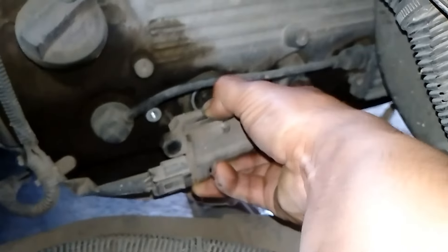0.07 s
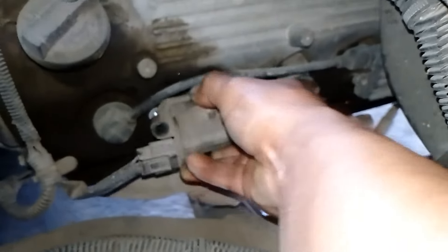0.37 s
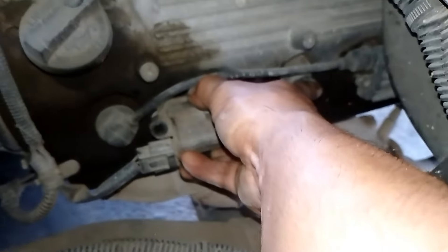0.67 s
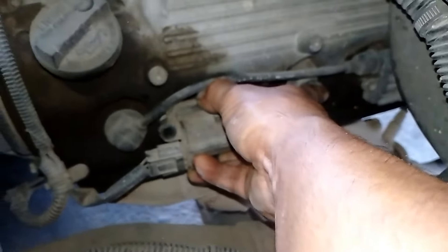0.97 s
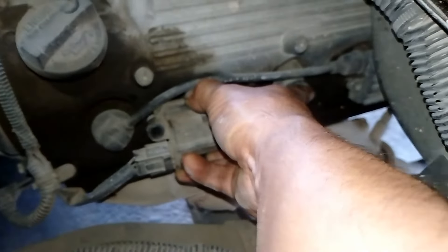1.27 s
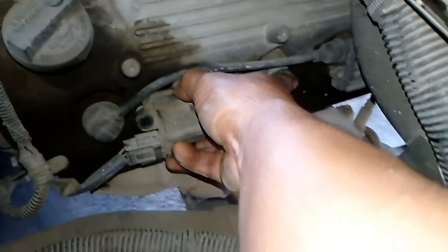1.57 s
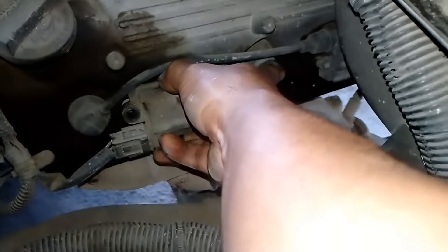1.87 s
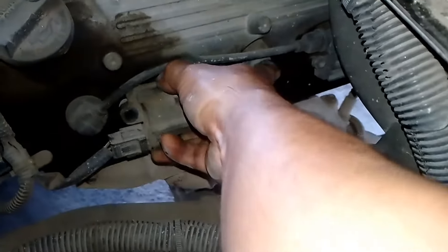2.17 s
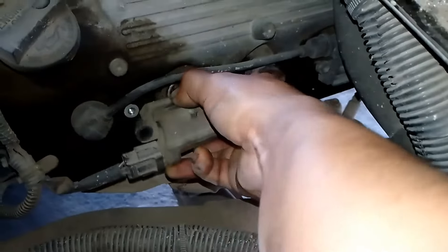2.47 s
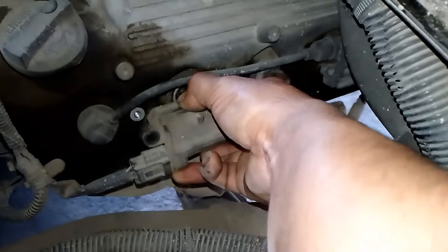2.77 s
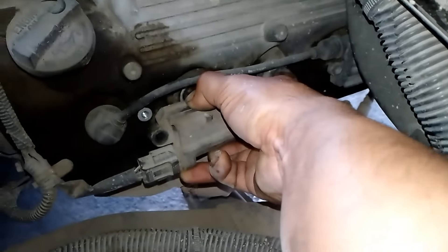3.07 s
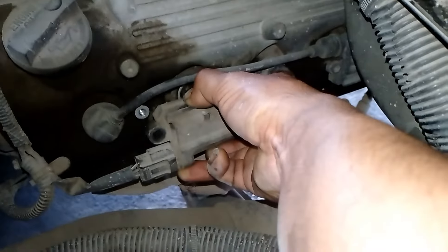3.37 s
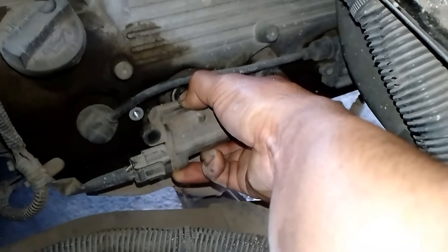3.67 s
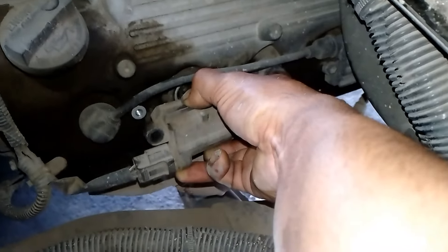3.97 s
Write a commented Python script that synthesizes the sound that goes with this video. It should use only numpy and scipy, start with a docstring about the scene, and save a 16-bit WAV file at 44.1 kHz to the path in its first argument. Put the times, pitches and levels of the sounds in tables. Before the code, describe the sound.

A car engine idles close by, with a low rumble, steady hum, airy wash and rapid ticking. At first it misfires, with sharp electric spark snaps and a faint hollow whoosh. At about 0.5 seconds the snapping stops and the idle rises and smooths. From about 2.4 seconds the fast, ringing snaps return, and the engine slows and shakes unevenly until the end at 4 seconds.

```python
"""A four-cylinder engine rumbles and shakes at a slow idle, heard from just above the valve cover.
With it come a steady hum (probably the idle air valve), a hollow whoosh, a wash of belts and air, and
ticking injectors and valves. An ignition coil is lifted, so its spark jumps outside once per crank turn
and sets the plug well ringing. The coil is reseated and the idle rises and smooths; when it is lifted
again, the snapping and the misfire return."""
import sys
import numpy as np
from scipy import signal
from scipy.fft import rfft, irfft
from scipy.io import wavfile
from scipy.ndimage import uniform_filter1d

SR = 44100
rng = np.random.default_rng(int(sys.argv[2]) if len(sys.argv) > 2 else 0)


def wrap_up_sound(samples):
    """Save the sound to the file named by the first command line argument, as 16-bit audio."""
    columns = np.atleast_2d(samples).T
    # keep every value between -1 and 1, then stretch to whole-number steps
    tamed = np.clip(columns, -1, 1)
    steps = np.round(tamed * 32767).astype(np.int16)
    wavfile.write(sys.argv[1], SR, steps)


N = 176400


def undb(db):
    """Decibels to amplitude ratio."""
    return 10 ** (np.asarray(db) / 20)


def unit(x):
    """Normalise to rms 1."""
    return x / np.sqrt(np.mean(x ** 2))


def curve(rows):
    """Linear interpolation of (seconds, value) rows."""
    return np.interp(np.arange(N) / SR, *np.array(rows).T)


def drift(rate_hz):
    """Smoothed random fluctuation of rms 1."""
    hold = int(SR / rate_hz)
    steps = np.repeat(rng.standard_normal(N // hold + 1), hold)
    return unit(uniform_filter1d(uniform_filter1d(steps, hold), hold)[:N])


def colour(x, spectrum, resonances=()):
    """Minimum-phase filter of unit power through (Hz, dB) points, with resonance peaks on top."""
    freq = np.maximum(np.arange(N // 2 + 1) * SR / N, 1)
    hz, db = np.array(spectrum).T
    peaks_db = sum(boost / (1 + (2 * (freq - centre) / width) ** 2)
                   for centre, width, boost in resonances)
    gain = unit(undb(np.interp(np.log(freq), np.log(hz), db) + peaks_db))
    cepstrum = irfft(np.log(gain))
    cepstrum[1:N // 2] *= 2
    cepstrum[N // 2 + 1:] = 0
    return irfft(rfft(x) * np.exp(rfft(cepstrum)))


def noise(spectrum, resonances=()):
    """Filtered white noise of rms near 1."""
    return colour(rng.standard_normal(N), spectrum, resonances)


def impacts(cycle, places, levels_db, rise_s, decay_s, scatter_db=0, repeat_s=0):
    """Noise bursts at set places in the engine cycle; being incoherent, they add in power."""
    t, power = np.arange(N // 40) / SR, np.zeros(N)
    envelope = (1 - np.exp(-t / rise_s)) * np.exp(-t / decay_s)
    for place, db in zip(places, levels_db):
        passes = np.arange(int(cycle[-1]) + 1) + place
        starts = np.interp(passes, cycle, np.arange(N) / SR, left=-1, right=-1)
        for start, chance in zip(starts, rng.standard_normal(len(starts))):
            for lag in {0, repeat_s}:
                add(power, start + lag, (envelope * undb(db + scatter_db * chance)) ** 2)
    return np.sqrt(power) * rng.standard_normal(N)


def add(out, start_s, x):
    """Superpose a short signal at a given time."""
    i = int(start_s * SR)
    if 0 <= i < N:
        out[i:i + len(x)] += x[:N - i]


# Firing harmonics. Each row: multiple of the cycle rate, relative dB firing evenly, and misfiring.
FIRING_ORDERS = [(2, -55, -55), (4, -48, -43), (6, -46, -64), (7, -57, -47), (8, -39, -39),
                 (10, -58, -38.5), (12, -52.5, -46), (16, -46, -49), (20, -38, -62), (22, -55, -40.5),
                 (24, -40.5, -61)]
# Blend from even firing to misfire. Each row: time in seconds, share from 0 to 1.
MISFIRE_SHARE = [(0, 1), (.36, 0.96), (.5, 0.05), (2.45, 0), (2.65, 0.84), (4, 0.85)]
# Swell of all the harmonics. Each row: time in seconds, gain in dB.
FIRING_GAIN = [(0, -8), (.28, -4), (.6, 4), (1, 2), (2.1, 0), (2.55, -3.5), (2.9, -2), (3.5, 1.5), (4, -8)]

def firing_rumble(cycle):
    """Periodic firing gives a harmonic series; a dead cylinder strengthens the in-between orders."""
    misfire = curve(MISFIRE_SHARE)
    harmonics = np.zeros(N)
    for order, even_db, rough_db in FIRING_ORDERS:
        level_db = even_db + (rough_db - even_db) * misfire + 1.7 * drift(rate_hz=5.3)
        harmonics += undb(level_db) * np.sin(2 * np.pi * (round(order) * cycle + rng.random()))
    return np.sqrt(2) * harmonics * undb(curve(FIRING_GAIN))


# Low noise band near 170 Hz. Each row: frequency in Hz, relative level in dB.
BOOM_SPECTRUM = [(90, -28.5), (125, -12.5), (150, 2.5), (185, 5), (215, -2), (280, -5.5), (340, -17.5),
                 (500, -44.5)]
# Swell of the boom. Each row: time in seconds, relative level in dB.
BOOM_LEVEL = [(0, -31.5), (.25, -30), (.38, -33.5), (.55, -29.5), (.8, -29), (1, -32.5), (2.4, -34),
              (2.85, -39.5), (3.08, -30.5), (3.28, -40), (3.45, -32), (3.8, -39.5), (3.92, -30.5)]

def boom(cycle):
    """Amplitude modulation: low noise throbs on each of the four strokes."""
    throb = 1 + 0.36 * np.cos(2 * np.pi * 4 * (cycle - 0.16))
    return noise(BOOM_SPECTRUM) * throb * undb(curve(BOOM_LEVEL) - 1)


def hum(pitch_hz=250.4, level_db=-29.5):
    """A pure tone, independent of engine speed, with slight frequency and amplitude modulation."""
    phase = 2 * np.pi * np.cumsum(pitch_hz + 0.42 * drift(rate_hz=6.48)) / SR
    return np.sqrt(2) * np.sin(phase) * undb(level_db + 0.7 * drift(rate_hz=7.04))


# Colour of the rushing air. Each row: frequency in Hz, relative level in dB.
WHOOSH_SPECTRUM = [(300, -50.5), (660, -10), (735, 7), (840, -18.5), (950, 0), (1100, 5), (1300, -11.5),
                   (2500, -70)]
# Its fade and return. Each row: time in seconds, level in dB.
WHOOSH_LEVEL = [(0, -38), (.45, -37.5), (.65, -43.5), (1.5, -51), (2.4, -61), (3, -49), (4, -42)]

def whoosh():
    """Two narrow spectral peaks make a rush of air sound hollow."""
    return undb(curve(WHOOSH_LEVEL)) * noise(WHOOSH_SPECTRUM)


# Noise of belts and air. Each row: frequency in Hz, relative level in dB.
WASH_SPECTRUM = [(12, 0.5), (30, -2.5), (55, 2), (80, 3.5), (120, -0.5), (270, 1.5), (340, -5.5),
                 (450, -6.5), (560, -11), (900, -14.5), (1300, -8.5), (2000, -4.5), (3400, -18),
                 (4400, -17.5), (5700, -28), (7800, -25.5), (9500, -33.5), (12500, -55), (15500, -36)]
# Modes of the valve cover. Each row: centre in Hz, width in Hz, boost in dB.
COVER_MODES = [(737, 37, 8), (1109, 52, 8), (1580, 30, 5), (2190, 12, 6.5), (2462, 47, 8.5), (2596, 31, 5),
               (2738, 37, 7.5), (3060, 42, 4)]

def belt_and_air_wash(level_db=-30.5):
    """Broadband noise of belts and air excites the resonances of the cover."""
    return undb(level_db + 0.43 * drift(rate_hz=25.2)) * noise(WASH_SPECTRUM, COVER_MODES)


# Injector timing. Each row: place in the cycle from 0 to 1, relative level in dB.
INJECTOR_CLICKS = [(0.119, 1.5), (.378, -1), (.63, -22), (0.886, -5.5)]
# Colour of a click. Each row: frequency in Hz, relative level in dB.
INJECTOR_SPECTRUM = [(3000, -36), (6000, -11), (7200, -9.5), (8100, 2), (9000, -19), (12500, -27),
                     (15500, -15)]

def injectors(cycle, open_s=0.0045):
    """Paired impacts: each injector clicks as it opens and again as it shuts."""
    places, levels_db = np.array(INJECTOR_CLICKS).T
    clicks = impacts(cycle, places, levels_db, rise_s=0.00073, decay_s=0.0035, repeat_s=open_s)
    return undb(-36.5) * colour(clicks, INJECTOR_SPECTRUM)


# Valve seatings. Each row: place in the cycle from 0 to 1, relative tick and clatter levels in dB.
VALVE_SEATINGS = [(0.001, 2, -1), (0.062, -5.5, -4.5), (0.25, -1.5, 2.5), (.312, -15, -1.5),
                  (0.497, -0.5, -0.5), (.55, -12.5, -12), (0.667, -13, -3), (0.753, -57, 1),
                  (0.948, -10, -3.5)]
# Colours of the tick and the clatter. Each row: frequency in Hz, relative level in dB.
TICK_SPECTRUM = [(900, -40.5), (2000, -1), (3100, -1), (4400, -6), (5500, -20), (7500, -20), (12000, -47.5),
                 (15500, -47)]
CLATTER_SPECTRUM = [(600, -18), (1400, -9), (2000, 1), (2700, -6.5), (3500, -2.5), (4400, -25.5),
                    (7000, -23.5), (15000, -53)]

def valves(cycle, rpm, db_per_rpm=0.0179):
    """Impact excitation: seating valves tick and clatter in the cover, harder at higher speed."""
    places, tick_db, clatter_db = np.array(VALVE_SEATINGS).T
    tick = impacts(cycle, places, tick_db, rise_s=0.00026, decay_s=0.0047)
    clatter = impacts(cycle, places, clatter_db, rise_s=0.0037, decay_s=0.014, scatter_db=1)
    tick = undb(-21) * colour(tick, TICK_SPECTRUM, COVER_MODES)
    clatter = undb(-23.5) * colour(clatter, CLATTER_SPECTRUM, COVER_MODES)
    return (tick + clatter) * undb(db_per_rpm * (rpm - 900))


def at_onset_level(x, db):
    """Scale a transient so that its first 5.7 ms have the given rms level."""
    return x / np.sqrt(np.mean(x[:N // 700] ** 2)) * undb(db)


def damped_mode(t, hz, rise_s, decay_s):
    """A resonance builds up, then decays exponentially."""
    return (1 - np.exp(-(t / rise_s) ** 2)) * np.exp(-t / decay_s) * np.sin(2 * np.pi * hz * t)


def plug_well(t, ring_hz, ring_db, clack_db, upper_db):
    """Cavity resonance: a short ring with a faint, flatter tail, a lower clack and a late upper mode."""
    tail_hz, clack_hz, upper_hz = np.array([1856, 1434, 3402]) * (1 + 0.0099 * rng.standard_normal(3))
    ring = damped_mode(t, 0.999 * ring_hz, rise_s=0.0013, decay_s=0.0027)
    tail = undb(-12) * damped_mode(t, tail_hz, rise_s=0.0037, decay_s=0.0073)
    clack = damped_mode(t, clack_hz, rise_s=0.0003, decay_s=0.0014)
    upper = np.sin(2 * np.pi * upper_hz * t) / np.cosh((t - 0.0073) / 0.0013)  # peaks at 7.3 ms
    return (at_onset_level(ring + tail, ring_db - 1) + at_onset_level(clack, clack_db - 5)
            + 2 * upper * undb(upper_db + 2))


# Stray sparks. Each row: start in seconds, relative levels in dB of crack, ring, upper mode and spit,
# nominal ring pitch in Hz, relative clack level in dB.
STRAY_SPARKS = [(0.0686, -24.5, -17.5, -24.0, -32, 1910, -14.5),
                (0.1607, -24, -19.0, -24.5, -31, 1920, -31), (0.2496, -24.5, -12, -23.5, -42, 1920, -46),
                (0.3382, -27.5, -11, -28.0, -36, 1927, -39), (0.4201, -32, -19.5, -45, -47, 1905, -49),
                (2.4142, -39, -20, -45, -39, 1920, -30), (2.4834, -28, -11, -42, -45, 1950, -38),
                (2.552, -26, -13, -26.5, -36, 1946, -36), (2.6215, -23, -17, -27, -32.5, 1860, -29),
                (2.6909, -25.5, -13.5, -28, -37, 1950, -30), (2.7638, -21.5, -13.5, -24, -34, 1930, -26),
                (2.8384, -24.5, -15.5, -25.5, -39, 1940, -23), (2.9153, -24, -15.5, -26.5, -41, 1900, -26),
                (2.988, -27.5, -14, -23.5, -40, 1950, -24), (3.0613, -25, -13, -21.0, -40, 1940, -32),
                (3.1334, -23, -13, -26, -44, 1922, -23), (3.2049, -21.5, -18, -23.5, -33.5, 1960, -35),
                (3.2777, -25.5, -15, -23, -38, 1920, -29), (3.352, -25, -16, -25.5, -39, 1889, -24),
                (3.4241, -25, -13.5, -23.5, -36, 1936, -30), (3.497, -28, -17.5, -23, -31, 1868, -23),
                (3.5716, -25.5, -14.5, -24, -39, 1904, -39), (3.6476, -20, -12.5, -23.5, -32.5, 1880, -27),
                (3.7253, -25, -16.5, -21.5, -35, 1840, -40), (3.8061, -23.5, -17, -23, -36, 1960, -27),
                (3.8811, -23, -16, -24.5, -39, 1930, -37), (3.9569, -24.5, -14, -22, -31.5, 1880, -28)]
# Colours of the arc's crack and its bright spit. Each row: frequency in Hz, relative level in dB.
CRACK_SPECTRUM = [(150, -15), (270, -6), (400, 7.5), (560, 0), (800, 0), (1300, -1.5), (2400, -4),
                  (3500, -3), (4400, -13.5), (5400, -11), (6800, -42), (9000, -30.5), (12500, -40),
                  (15500, -23)]
SPIT_SPECTRUM = [(2000, -12), (3800, 6), (5300, -4.5), (6600, 0.5), (9000, -4.5), (12500, -19.5),
                 (15500, -8)]

def sparks(decay_s=0.0065, arc_gain_db=2.5):
    """Impulse excitation: each arc cracks, spits and sets the plug well ringing."""
    t = np.arange(N // 60) / SR
    decay = np.exp(-t / decay_s)
    crack, spit, well = np.zeros((3, N))
    for start, crack_db, ring_db, upper_db, spit_db, ring_hz, clack_db in STRAY_SPARKS:
        add(well, start, plug_well(t, ring_hz, ring_db, clack_db, upper_db))
        snap = 0.11 * rng.standard_normal(len(t)) * decay  # reflections among the engine parts
        snap[0] += 1  # the direct impulse
        add(crack, start, at_onset_level(snap, crack_db + arc_gain_db))
        add(spit, start, rng.standard_normal(len(t)) * decay * undb(spit_db + arc_gain_db))
    return colour(crack, CRACK_SPECTRUM) + colour(spit, SPIT_SPECTRUM) + well


# Crank speed. Each row: time in seconds, speed in turns per minute.
ENGINE_RPM = [(0, 633.2), (0.35, 698.3), (0.62, 872.9), (0.88, 941.7), (1.4, 933.8), (2.3, 874.3),
              (2.55, 879.9), (2.85, 786.7), (3.1, 837.9), (3.45, 813.5), (4, 745.7)]

def scene():
    """Superposition of all sources; rumble, boom, injectors and valves are phase-locked to the crank."""
    rpm = curve(ENGINE_RPM)
    cycle = 0.6105 + np.cumsum(rpm / 60 / 2) / SR  # one four-stroke cycle is two turns
    drone = firing_rumble(cycle) + boom(cycle) + hum() + whoosh() + belt_and_air_wash()
    return (drone + injectors(cycle) + valves(cycle, rpm) + sparks())[None]


def record(dry, cutoff_hz=15900):
    """A steep low-pass filter removes the highest treble."""
    return signal.sosfilt(signal.ellip(10, .2, 70, cutoff_hz, fs=SR, output="sos"), dry)


dry = scene()
out = record(dry)
wrap_up_sound(out)
```